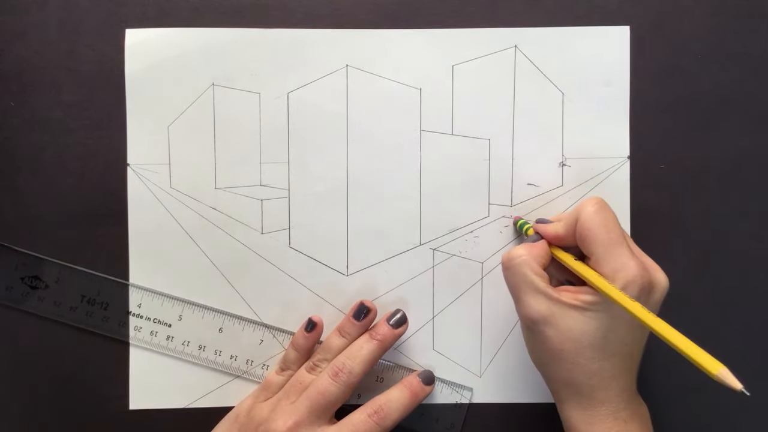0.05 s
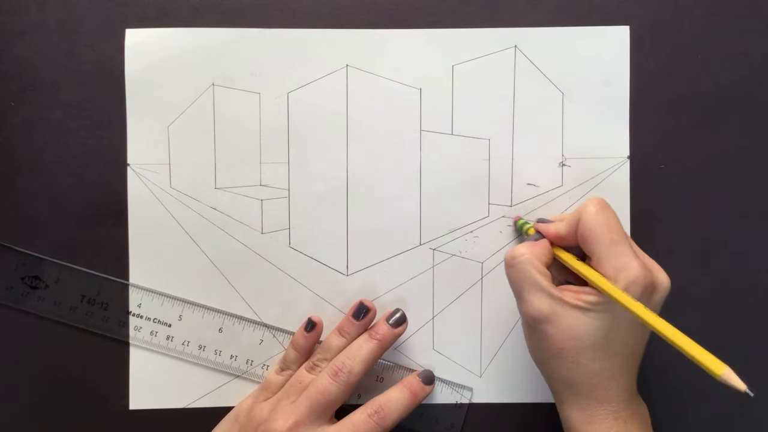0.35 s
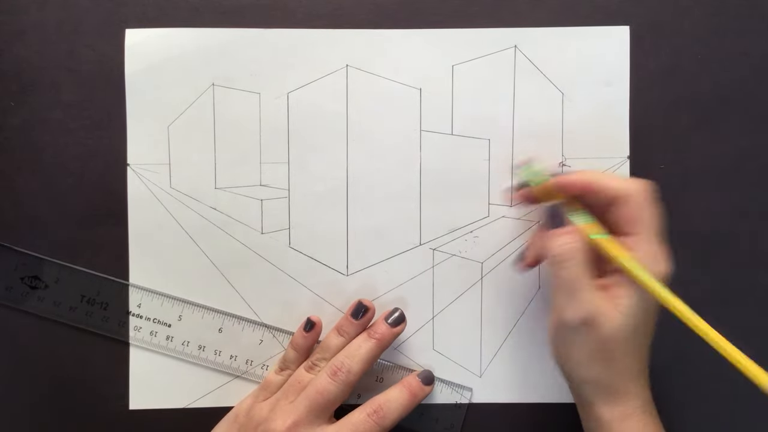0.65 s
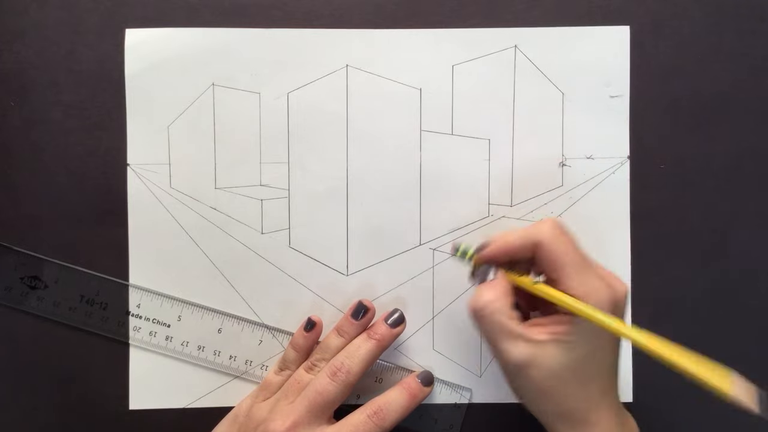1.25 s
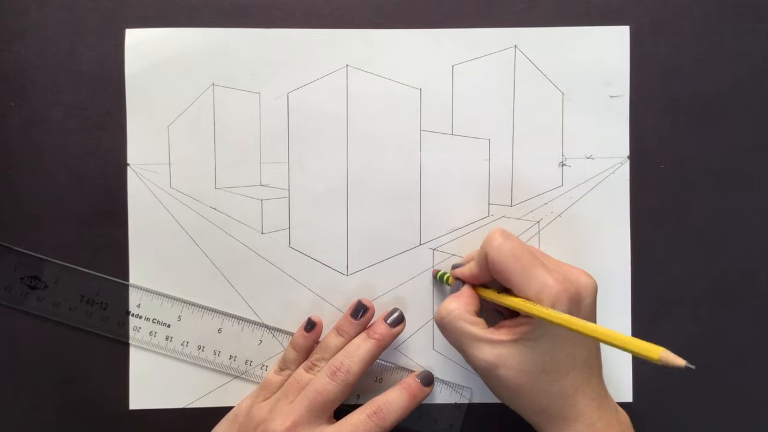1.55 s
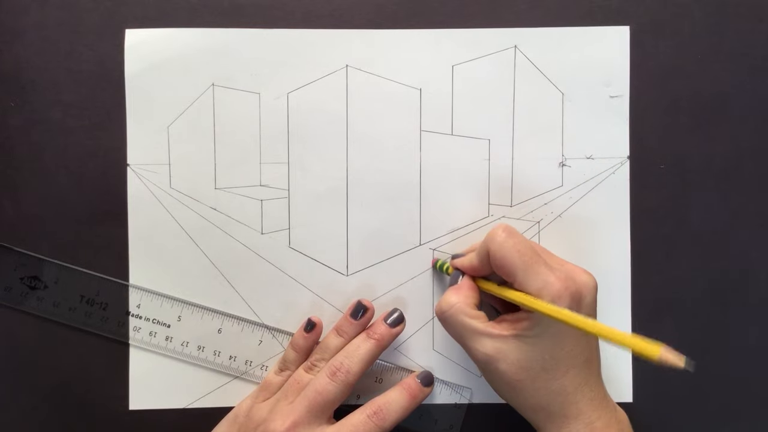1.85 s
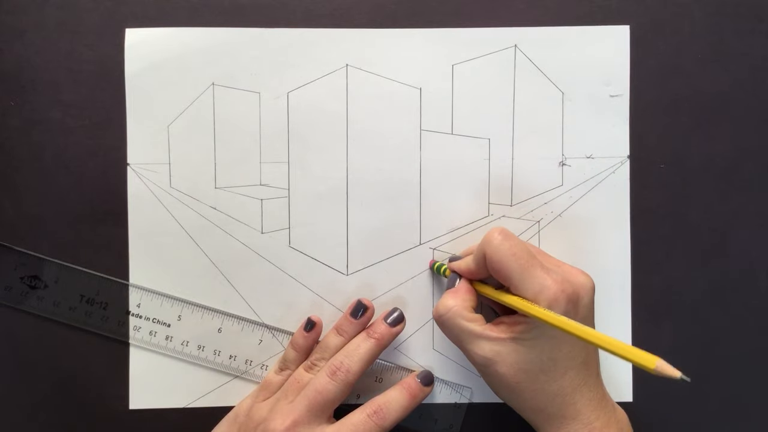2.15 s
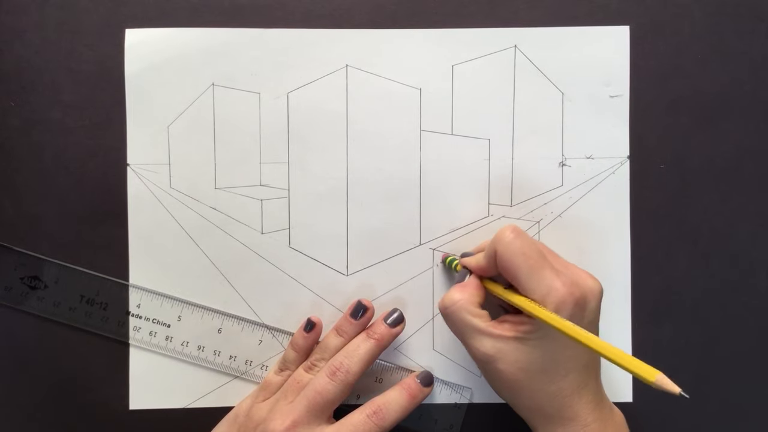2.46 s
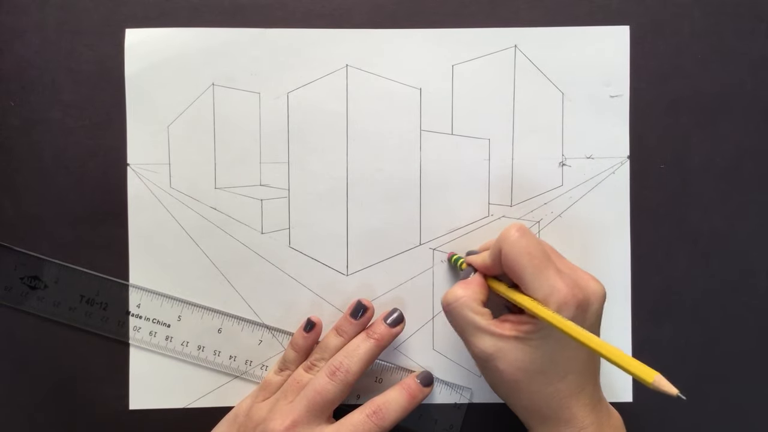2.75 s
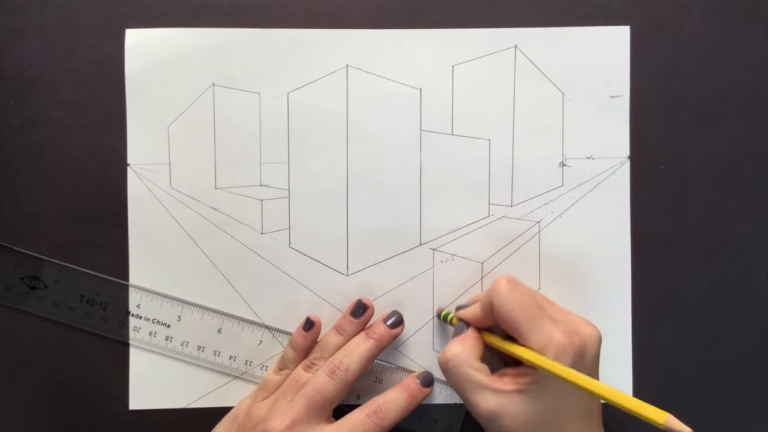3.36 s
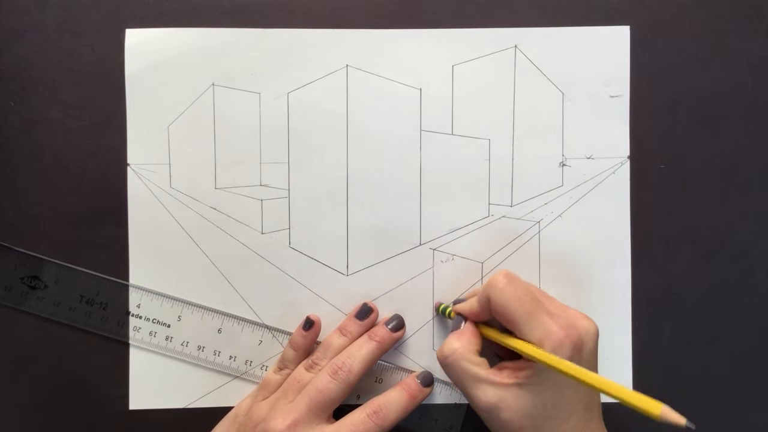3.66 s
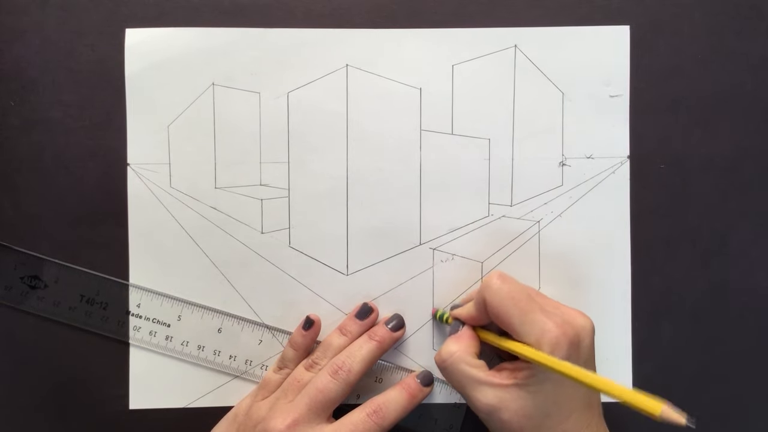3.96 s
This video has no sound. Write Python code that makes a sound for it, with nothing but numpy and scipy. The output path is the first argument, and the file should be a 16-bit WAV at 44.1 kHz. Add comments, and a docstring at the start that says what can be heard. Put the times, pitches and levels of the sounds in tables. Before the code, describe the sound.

Close to a desk in a quiet, humming room, a pencil's eraser swishes on paper, pauses for three quick brushes of the fingers, then rubs on with light ticks, dull thumps and a brief hand slide.

```python
"""A desk in a quiet room, microphone close to a sheet of paper; ventilation and mains hum run throughout.
A pencil's eraser rubs three soft strokes, a hand bumps the desk and slides, the pencil ticks in the grip.
Near 1 s the paper snaps crisply as three quick flicks of the fingers sweep the crumbs away.
From 1.6 s the rubbing resumes, among more ticks, low bumps and dull knocks of the eraser on the desk.
At 3.2 s the hand slides over the sheet again, and a last, firmer run of strokes follows."""
import sys
import numpy as np
from scipy import signal
from scipy.fft import rfft, irfft
from scipy.io import wavfile
from scipy.ndimage import uniform_filter1d

SR = 44100
rng = np.random.default_rng(int(sys.argv[2]) if len(sys.argv) > 2 else 0)


def log_audio(samples):
    """Write samples as a 16-bit WAV file to the path given in sys.argv[1]."""
    # one column per channel
    frames = np.atleast_2d(samples).T
    # limit to full scale, then quantise
    limited = np.clip(frames, -1, 1)
    pcm = np.round(limited * 32767).astype(np.int16)
    wavfile.write(sys.argv[1], SR, pcm)


N = 176400


def amp(db):
    """Decibels to gain."""
    return 10 ** (np.asarray(db) / 20)


def unit(x):
    """Scales to rms 1."""
    return x / np.sqrt(np.mean(abs(x) ** 2) + 1e-30)


def add(mix, start_s, sound):
    """Mixes a sound in at start_s."""
    part = mix[max(round(start_s * SR), 0):][:len(sound)]
    part += sound[:len(part)]


def coloured(x, colour, resonances=()):
    """Filters x by (freq_hz, level_db) points and (centre_hz, width_hz, lift_db) humps; rms 1."""
    f = np.fft.rfftfreq(len(x), 1 / SR)
    octave = np.log2(f + 1)
    hz, db = np.transpose(colour)
    octaves_outside = abs(octave - np.clip(octave, np.log2(hz[0]), np.log2(hz[-1])))
    humps = sum(lift * np.exp(-((f - centre) / width) ** 2) for centre, width, lift in resonances)
    gain = amp(np.interp(octave, np.log2(hz), db) + humps - 24 * octaves_outside)
    return unit(irfft(rfft(x) * gain, len(x)))


def drift(hz, size=N):
    """Random wavering of rms 1, up to about the given rate."""
    f = np.fft.rfftfreq(size, 1 / SR)
    return unit(irfft(rfft(rng.standard_normal(size)) * np.exp(-(f / hz) ** 2), size))


# Ventilation, low in the room, and its thin hiss of air: freq_hz, level_db
RUMBLE_COLOUR = [(38, -10), (48, -4.5), (58, 1), (68, -2.5), (85, 3.5), (105, -2), (135, 6), (175, -3.5),
                 (215, -9.5), (300, -16.5), (370, -21), (440, -27), (520, -27.5), (700, -39.5)]
AIR_COLOUR = [(400, -9.5), (650, 4.5), (900, -1), (1450, -2), (2000, -9), (3000, -14.5), (5000, -16.5),
              (6500, -18.5), (8800, -17.5), (10500, -18), (14000, -21), (15500, -34)]
# Faint narrow bands in the hiss: centre_hz, width_hz, lift_db
AIR_BANDS = [(1477, 35, -3.5), (5200, 100, 4.5), (8930, 120, 5.5)]
# Hum of the mains and the fan: pitch_hz, level_db, width_hz, waver_depth
HUM_TONES = [(58.27, -55, 7, 0.17), (121.45, -59, 3.3, 0.66), (190.8, -64.5, 13, 0.46),
             (282.2, -68.5, 11, 1), (382.2, -71, 8.6, 0.98), (530, -82.5, 6, 0.95), (670, -95.5, 4.3, 0.44)]

def room_tone(rumble_db=-50.5, waver_db=-0.5, air_db=-81.5):
    """Behind the desk sounds, ventilation rumbles, the mains and fan hum, and air hisses."""
    t = np.arange(N) / SR
    rumble = amp(rumble_db + waver_db * drift(5.6)) * coloured(rng.standard_normal(N), RUMBLE_COLOUR)
    hum = np.zeros(N)
    for hz, db, width_hz, depth in HUM_TONES:
        waver = 1 + depth * (drift(width_hz) + 1j * drift(width_hz))  # in both level and phase
        tone = np.exp(2j * np.pi * (hz * t + rng.random()))
        hum += amp(db) * unit((waver * tone).real)
    air = amp(air_db) * coloured(rng.standard_normal(N), AIR_COLOUR, AIR_BANDS)
    return rumble + hum + air


def sheet_wander(x, depth_db=1.7):
    """The sheet's fine resonances come and go as the contact moves across it."""
    spectra = signal.stft(x, nperseg=256)[2]
    patches = uniform_filter1d(rng.standard_normal(spectra.shape), size=2, axis=0)  # across frequency
    patches = unit(uniform_filter1d(patches, size=9, axis=1))  # across time
    return unit(signal.istft(spectra * amp(depth_db * patches))[1][:len(x)])


def friction(speed, colour, resonances, grain_db, tilt_db=0, clump_hz=500, clump_db=0.86):
    """Countless tiny slips over paper fibres, uneven and in small clumps, as loud as the motion is fast."""
    size = len(speed)
    slips = rng.standard_normal(size) * amp(grain_db * np.minimum(rng.exponential(1, size), 5))
    clumps = amp(clump_db * drift(clump_hz, size))
    tilted = [(hz, db + tilt_db * np.log2(hz)) for hz, db in colour]
    return speed * sheet_wander(coloured(slips * clumps, tilted, resonances))


# Eraser strokes, close up: start_s, length_s, level_db, fastest_fraction, ring_hz, ring_db,
# middle_hz, body_db, tilt_db_per_octave
STROKES = [(0.227, 0.068, -87, 0.3, 6600, 2, 4050, -3, -4), (0.308, .085, -88.5, .5, 6750, 8, 4050, -2, 0),
           (0.476, 0.072, -81, 0.26, 6640, 9, 5400, 5, -3),
           (1.631, 0.054, -79, 0.3, 6850, 10, 4000, 13.5, 1),
           (1.739, 0.064, -81, 0.23, 6800, 9, 3960, 10.5, 0),
           (1.84, 0.057, -80.5, 0.28, 6950, 9, 4000, 6, -1),
           (1.963, 0.045, -78.5, 0.3, 6650, 11, 4050, 10, -1),
           (2.049, 0.061, -83.5, 0.5, 7000, 9, 4050, 6, -2.5),
           (2.185, 0.034, -86.5, 0.4, 6700, 5, 4050, 6, -2.5),
           (2.361, 0.069, -81, 0.53, 6700, 12, 5130, 5, -1), (2.591, 0.061, -83, 0.3, 6600, 9, 4050, 2, -3),
           (2.727, 0.077, -82, 0.4, 6500, 11.5, 5100, 5, -0.5),
           (2.909, .055, -85, 0.9, 6550, 9, 4050, 4, -2),
           (3.073, 0.087, -84.5, 0.1, 6750, 10, 5100, 3, -2.5),
           (3.517, 0.027, -87.5, 0.8, 6860, 10, 4050, 10, 0),
           (3.606, 0.061, -73.5, 0.13, 6840, 13, 4200, 8, 2.5),
           (3.731, 0.057, -76.5, 0.44, 6750, 13.5, 4380, 11, .5),
           (3.842, 0.055, -76, 0.18, 6840, 10, 4700, -2, -1.5),
           (3.979, 0.038, -79, 0.27, 6900, 14.5, 4300, 6, -1)]
# Hiss of rubber on paper: freq_hz, level_db
ERASER_COLOUR = [(900, 2), (2100, 0), (3000, -4.5), (4600, -3), (5500, 0), (6100, 1.5), (7300, 0),
                 (8500, -3.5), (10500, -2.5), (12300, -2), (14300, -3.5), (15500, -5)]
# Peaks and dips of the sheet under the eraser: centre_hz, width_hz, lift_db
SHEET_UNDER_ERASER = [(4500, 160, 1.5), (5570, 150, 3.5), (6280, 160, -2.5), (10540, 320, 3),
                      (11060, 200, -2), (11800, 350, 3)]

def eraser_strokes(ring_width_hz=470, middle_width_hz=610, low_hz=2110, low_width_hz=390):
    """Each stroke speeds up and slows; the rubber hisses through a high ring, with more body on some."""
    out, t = np.zeros(N), np.arange(8192) / SR
    for start, length, db, fastest, ring_hz, ring_db, middle_hz, body_db, tilt_db in STROKES:
        progress = np.interp(t / length, [0, np.clip(fastest, .05, .95), 1], [0, .5, 1])
        speed = abs(np.sin(np.pi * progress)) ** 0.69
        body = [(middle_hz, middle_width_hz, body_db), (low_hz, low_width_hz, body_db)]
        resonances = [(ring_hz, ring_width_hz, ring_db), *body, *SHEET_UNDER_ERASER]
        rub = friction(speed, ERASER_COLOUR, resonances, grain_db=1.5, tilt_db=tilt_db)
        add(out, start, amp(db) * rub)
    return out


# Soft bumps of the hand on the desk: start_s, level_db, pitch_hz
BUMPS = [(0.295, -38.5, 83), (0.8, -34.5, 72.6), (1.896, -37.5, 150), (2.031, -32.5, 139),
         (2.128, -31, 107.6), (2.422, -31.5, 118.4), (2.446, -36, 137), (3.382, -36, 111)]

def hand_bumps(attack_s=0.0041, t60_s=0.068):
    """The desk top gives a few low swings under the hand."""
    out, t = np.zeros(N), np.arange(8192) / SR
    for start, db, hz in BUMPS:
        envelope = amp(db - 60 * t / t60_s) * np.minimum(t / attack_s, 1)
        add(out, start, envelope * np.sin(2 * np.pi * hz * t))
    return out


def skin_speed(length_s, attack_s, release_s, swell_db):
    """Envelope of skin moving on paper: touch, speed up, lift."""
    t = np.arange(SR // 2) / SR
    touch = np.minimum(t / attack_s, 1)
    swell = amp(swell_db * (np.minimum(t / length_s, 1) - 1))
    lift = np.exp(-np.maximum(t - length_s, 0) / release_s)
    return touch * swell * lift


# The hand sliding on the sheet: start_s, length_s, level_db, attack_s, release_s, tilt_db_per_octave,
# lower_hz, lower_db, upper_hz, upper_db
SLIDES = [(0.598, 0.02, -82, .008, 0.03, 3, 13300, 9, 14300, 9),
          (0.653, 0.082, -74, 0.014, 0.0025, 0.5, 6100, 10, 6750, 10),
          (3.219, 0.13, -72, 0.014, 0.034, -.5, 5050, 6.5, 11950, 0)]
# Hiss of skin on paper: freq_hz, level_db
SLIDE_COLOUR = [(1000, -12), (2500, -12.5), (4300, -4), (5600, -8), (7200, -1), (8500, -1), (10700, -2),
                (12500, 0), (15700, -2.5)]
# Peaks and dips of the sheet under the hand: centre_hz, width_hz, lift_db
SHEET_UNDER_HAND = [(4340, 200, -4), (5600, 200, 3), (6340, 170, 5), (10800, 200, -3)]

def hand_slides(width_hz=190):
    """The side of the hand brushes along the paper, which resonates differently at each place."""
    out = np.zeros(N)
    for start, length, db, attack, release, tilt_db, lower_hz, lower_db, upper_hz, upper_db in SLIDES:
        speed = skin_speed(length, attack, release, swell_db=1.5)
        resonances = [(lower_hz, width_hz, lower_db), (upper_hz, width_hz, upper_db), *SHEET_UNDER_HAND]
        brush = friction(speed, SLIDE_COLOUR, resonances, grain_db=1.5, tilt_db=tilt_db)
        add(out, start, amp(db) * brush)
    return out


# Ticks of the pencil in the grip: start_s, level_db, tilt_db_per_octave, desk_db
TICKS = [(.676, -74.5, -5, -82), (1.474, -74.5, -10, -76), (1.8711, -64, -2.5, -68.5),
         (2.0772, -60, -2.5, -67), (2.304, -74.5, -6, -88), (2.6843, -75, -12, -81),
         (3.2205, -68, -9.5, -81), (3.6463, -74.5, -8, -75), (3.8643, -62, -4.5, -82.5)]
# Modes of the pencil: pitch_hz, level_db, t60_s
PENCIL_MODES = [(820, -2, 0.017), (1006, -11, 0.077), (1442, 5.5, 0.031), (1710, -13, 0.018),
                (2330, -7, 0.047), (2480, -1, 0.032), (2940, -16, 0.078)]
# The desk's answer from under the sheet: freq_hz, level_db
DESK_COLOUR = [(150, -15), (300, 1.5), (500, 6.5), (720, -7.5), (1000, -36), (2000, -41)]

def pencil_ticks(attack_s=0.0023, desk_rise_s=0.019):
    """The pencil rings briefly, and the desk answers with a dull rumble."""
    out, t = np.zeros(N), np.arange(8192) / SR
    pivot_hz = PENCIL_MODES[2][0]
    desk_envelope = t / desk_rise_s * np.exp(1 - t / desk_rise_s)
    for start, db, tilt_db, desk_db in TICKS:
        ring = np.zeros(len(t))
        for hz, mode_db, t60 in PENCIL_MODES:
            decay = amp(mode_db + tilt_db * np.log2(hz / pivot_hz) - 60 * t / t60)
            ring += decay * np.sin(2 * np.pi * (hz * t + rng.random()))
        desk = coloured(rng.standard_normal(len(t)), DESK_COLOUR) * desk_envelope
        add(out, start, amp(db) * ring * np.minimum(t / attack_s, 1) + amp(desk_db) * desk)
    return out


# Crisp snaps of the sheet, close up: start_s, level_db, centre_hz, width_octaves, length_s
SNAPS = [(0.741, -61.5, 6100, 1, 0.0053), (0.9759, -55.5, 6240, 0.19, 0.0019),
         (0.9761, -61.5, 8000, 0.13, .003), (0.9733, -69.5, 2420, 0.59, 0.0047),
         (3.522, -87, 10000, .6, 0.0018), (3.6368, -59, 13400, 0.28, 0.0011)]

def paper_snaps():
    """The paper catches and lets go with a very short burst."""
    out, t = np.zeros(N), np.arange(2048) / SR
    octave = np.log2(np.fft.rfftfreq(len(t), 1 / SR) + 1)
    for start, db, hz, width, length in SNAPS:
        band = 1 / (1 + ((octave - np.log2(hz)) / width) ** 2)
        burst = irfft(rfft(rng.standard_normal(len(t))) * band)
        fade = np.exp(-(t / length) ** 2)
        add(out, start, amp(db) * unit(burst * fade) * fade.std())
    return out


# Fingers flicking across the sheet: start_s, length_s, level_db, swell_db, release_s,
# peak_hz, peak_db, dip_hz, dip_db
FLICKS = [(0.742, 0.056, -56.5, 10.5, 0.0024, 6760, 0, 10400, -6),
          (0.975, .061, -60, 4.5, 0.0057, 8750, 2, 14300, -3),
          (1.198, 0.036, -58, 7, 0.011, 6100, 7, 4270, -1)]
# Bright hiss of swept crumbs: freq_hz, level_db
FLICK_COLOUR = [(800, -11.5), (2000, -17), (3500, -8.5), (4700, -10), (6100, -1.5), (7000, -0.5),
                (8300, -1), (10400, -1), (13200, 2), (15700, -2.5)]

def finger_flicks(attack_s=0.0025, peak_width_hz=190, dip_width_hz=130):
    """Fingers land already moving and speed up, whisking the gritty crumbs off the sheet."""
    out = np.zeros(N)
    for start, length, db, swell_db, release, peak_hz, peak_db, dip_hz, dip_db in FLICKS:
        speed = skin_speed(length, attack_s, release, swell_db)
        resonances = [(peak_hz, peak_width_hz, peak_db), (dip_hz, dip_width_hz, dip_db)]
        add(out, start, amp(db) * friction(speed, FLICK_COLOUR, resonances, grain_db=1))
    return out


# Knocks of the eraser on the desk as it turns round: start_s, level_db
KNOCKS = [(1.891, -61.5), (2.095, -64.5), (2.304, -72), (2.346, -71.5), (2.517, -75)]
# Modes of the desk top: pitch_hz, level_db, t60_s
DESK_MODES = [(423, -2.5, 0.11), (535, -5, 0.091), (617, -1, .09), (762, -5.5, 0.063)]

def eraser_knocks(attack_s=0.0028):
    """The eraser presses through the sheet and the desk top rings dully."""
    out, t = np.zeros(N), np.arange(8192) / SR
    ring = sum(amp(db - 60 * t / t60) * np.sin(2 * np.pi * hz * t) for hz, db, t60 in DESK_MODES)
    for start, db in KNOCKS:
        add(out, start, amp(db) * ring * np.minimum(t / attack_s, 1))
    return out


def room_reflections(direct, level_db=-15.5, t60_s=0.18):
    """Close to the desk, the direct sound leads a short, weak tail of scattered reflections."""
    t = np.arange(SR // 2) / SR
    echoes = rng.standard_normal(len(t)) * (rng.random(len(t)) < .1)
    tail = echoes * (t > .003) * amp(-60 * t / t60_s)
    return direct + amp(level_db) * signal.fftconvolve(direct, tail / np.linalg.norm(tail))[:N]


def scene():
    """What reaches the one microphone: the desk sounds and their reflections, over the room tone."""
    background = room_tone()
    desk = eraser_strokes() + hand_bumps() + hand_slides() + pencil_ticks()
    desk += paper_snaps() + finger_flicks() + eraser_knocks()
    return (room_reflections(desk) + background)[None]


def record(dry, low_cut_hz=42, band_limit_hz=15850):
    """The recorder's low cut and band limit."""
    low_cut = signal.butter(4, low_cut_hz, "high", fs=SR, output="sos")
    band_limit = signal.firwin(511, band_limit_hz, window=("kaiser", 9), fs=SR)
    return signal.oaconvolve(signal.sosfilt(low_cut, dry), band_limit[None], "same")


dry = scene()
out = record(dry)
log_audio(out)
```